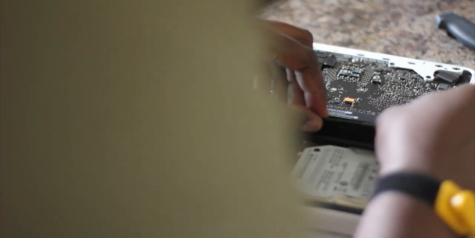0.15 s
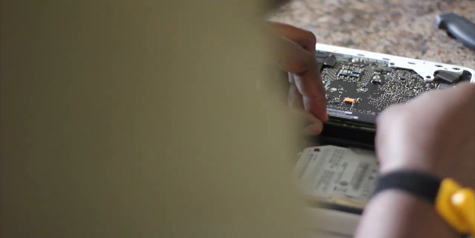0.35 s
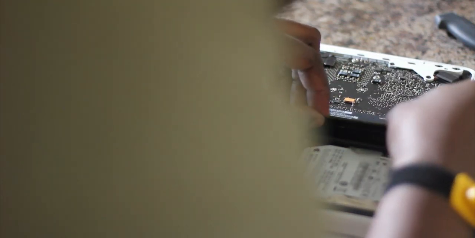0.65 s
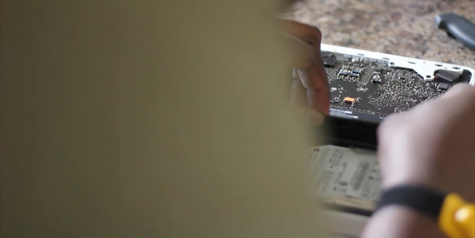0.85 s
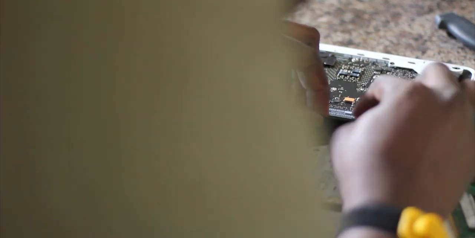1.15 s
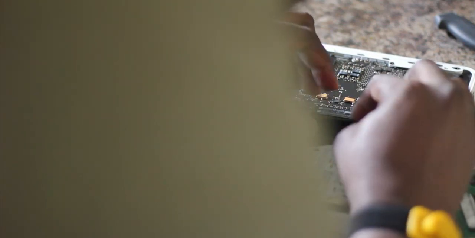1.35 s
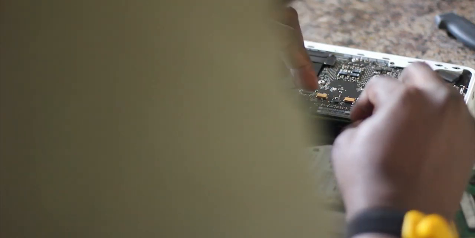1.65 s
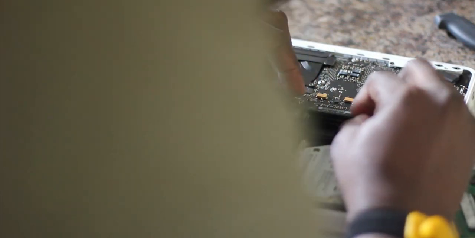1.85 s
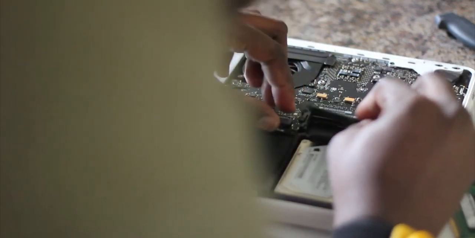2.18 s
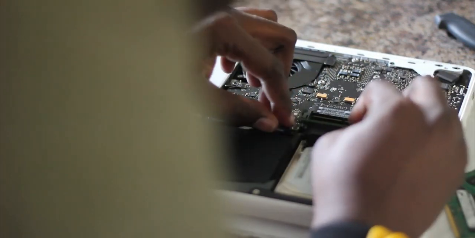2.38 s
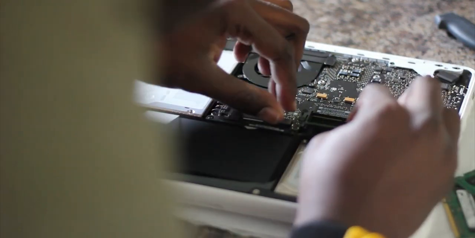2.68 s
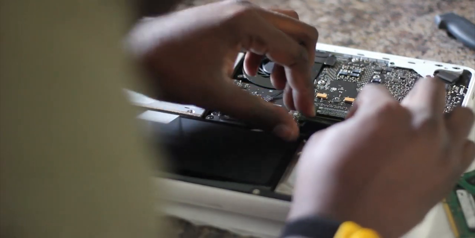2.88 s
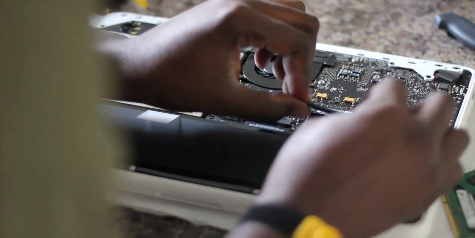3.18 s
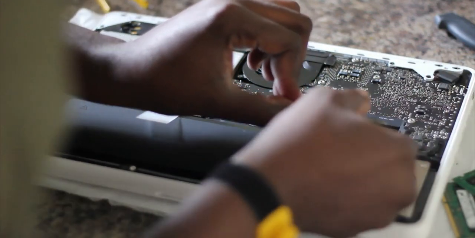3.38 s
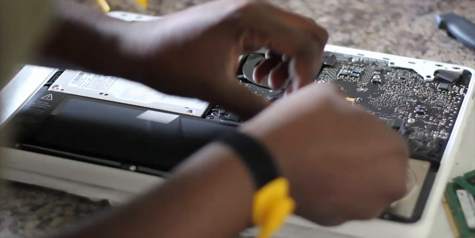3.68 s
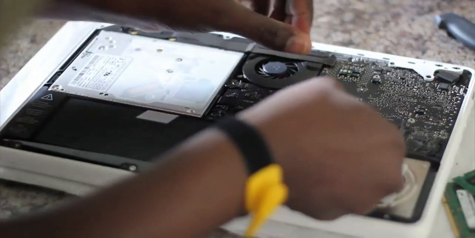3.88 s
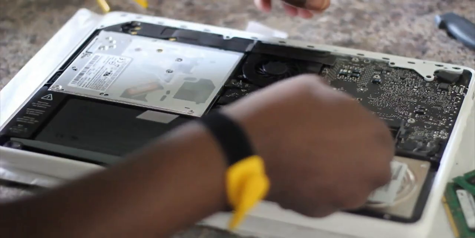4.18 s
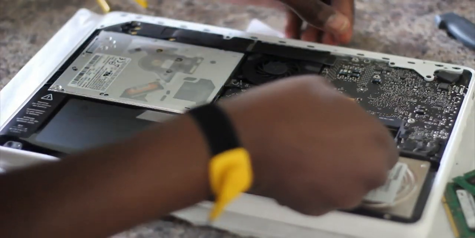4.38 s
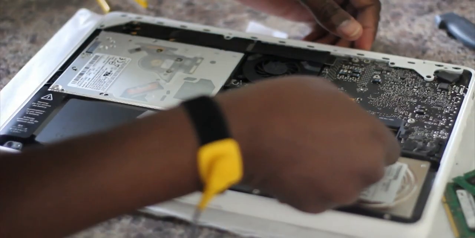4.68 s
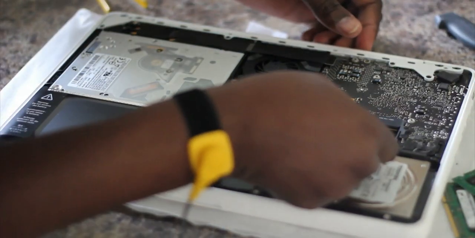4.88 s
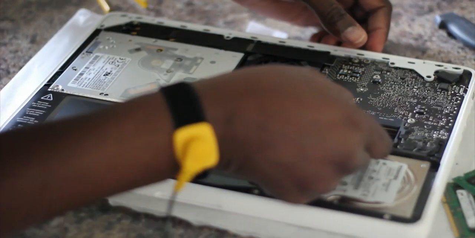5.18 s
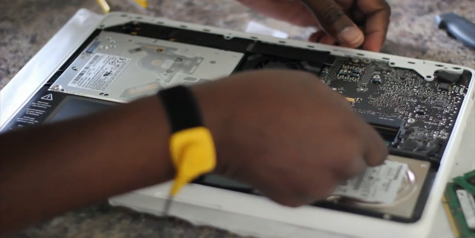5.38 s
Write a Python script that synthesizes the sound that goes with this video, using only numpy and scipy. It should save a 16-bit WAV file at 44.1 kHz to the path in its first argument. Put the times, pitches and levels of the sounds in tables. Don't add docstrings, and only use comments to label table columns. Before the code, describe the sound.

Fingers tick and tap at a memory module; it snaps in sharply, then skin slides and light rocking knocks follow over faint hiss.

```python
import sys
import numpy as np
from scipy import signal
from scipy.fft import rfft, irfft, next_fast_len
from scipy.io import wavfile
from scipy.ndimage import uniform_filter1d, map_coordinates

SR = 44100
rng = np.random.default_rng(int(sys.argv[2]) if len(sys.argv) > 2 else 0)


def dump(signal):
    limited = np.clip(np.atleast_2d(signal).T, -1, 1)
    pcm = np.round(limited * 32767).astype(np.int16)
    wavfile.write(sys.argv[1], SR, pcm)


def volts_from_decibels(level):
    exponent = np.asarray(level, float) / 20
    return 10 ** exponent


N = 244314


def unit(x):
    return x / np.sqrt(np.mean(x ** 2) + 1e-20)


def along(points, hz):
    f, v = np.transpose(points)
    return np.interp(np.log(hz + 1), np.log(f + 1), v)


def curves(rows, outside=None):
    s, *columns = np.transpose(rows)
    return [np.interp(np.arange(N) / SR, s, c, outside, outside) for c in columns]


def wobble(rate):
    knots = rng.standard_normal(int(N * rate / SR) + 4)
    return map_coordinates(knots, [np.arange(N) * rate / SR])


def filtered(x, response):
    m = next_fast_len(x.shape[-1] + 8192)
    spectrum = rfft(x, m) * response(np.fft.rfftfreq(m, 1 / SR))
    return irfft(spectrum, m)[..., :x.shape[-1]]


def mode(f, hz, width):
    return 1j * f * width / (hz * hz - f * f + 1j * f * width)


def evened(x, size=300):
    count = x.shape[-1]
    z = rfft(x, 2 * count)
    local_power = uniform_filter1d(np.abs(z) ** 2, 2 * size * count // SR)
    return irfft(z / np.sqrt(local_power))[..., :count]


def contacts(times, grain_db, t60, count=40):
    t = np.arange(SR // 10) / SR
    blows = volts_from_decibels(grain_db - 60 * t / t60) * rng.standard_normal((len(times), len(t)))
    blows[:, 0] = 1
    return evened(np.pad(blows, ((0, 0), (count, 0))), size=500)


def rung(blows, hz, share, ring, wide):
    hz = hz[:, None]
    x = filtered(blows, lambda f: (1 + ring * mode(f, hz, share * hz)) * mode(f, hz, wide * hz) ** 2)
    return x / np.abs(x).max(1, keepdims=True)


def placed(times, sounds):
    out = np.zeros(N + SR)
    for s, sound in zip(times, sounds):
        out[round(s * SR):][:len(sound)] += sound
    return out[:N]


# (frequency [Hz], level [dB])
HISS_SPECTRUM = [(12, -45), (20, -17), (43, -17), (146, -10), (222, -5.5), (262, -10), (337, -7), (499, -9),
                 (1190, -9.5), (1660, -15), (1810, -12.5), (5080, -16.5), (12400, -22), (16000, -25)]
# (frequency [Hz], width [Hz], level [dB])
DUCT_MODES = [(57.4, 13, -77.5), (126, 8.6, -76.5), (1167, 43, -75)]
# (time [s], level [dB])
MOTOR_LEVEL = [(0.0, -73), (0.42, -84), (0.66, -71), (0.82, -77.5), (1.2, -64.5), (1.53, -68.5),
               (1.76, -78), (3.29, -75.5), (3.78, -85), (4.15, -75), (5.54, -78.5)]


def background():
    hiss_db, motor_hz = -58.5, 90.3
    drone_db, drone_fade_db_per_s = -66.5, 3

    def narrow(hz, width):
        return unit(filtered(rng.standard_normal(N), lambda f: mode(f, hz, width)))

    hiss = unit(filtered(rng.standard_normal(N), lambda f: volts_from_decibels(along(HISS_SPECTRUM, f))))
    hiss *= volts_from_decibels(0.4 * wobble(3))
    duct = sum(volts_from_decibels(db + 1.5 * wobble(3)) * narrow(hz, width) for hz, width, db in DUCT_MODES)
    motor_db = curves(MOTOR_LEVEL)[0] + 1.34 * wobble(3.88)
    motor_phase = 2 * np.pi * np.cumsum(motor_hz + 1.04 * wobble(3.4)) / SR
    motor = volts_from_decibels(motor_db) * np.sqrt(2) * np.sin(motor_phase)
    drone_level = drone_db - drone_fade_db_per_s * np.arange(N) / SR + 1.4 * wobble(3.83)
    drone = volts_from_decibels(drone_level) * narrow(231.7, 16.0)
    return volts_from_decibels(hiss_db - 0.5) * hiss + duct + motor + drone


# (time [s], level [dB], frequency [Hz], t60 [s])
WRIST_BUMPS = [
    (0.0, -46, 74, 0.11),
    (1.868, -45, 507, 0.079),
    (1.874, -41, 238, 0.071),
    (1.908, -40.5, 170, 0.078),
    (1.93, -48, 89, 0.11),
]


def bumps():
    t = np.arange(SR // 4) / SR
    onset = 1 - np.exp(-t / 0.0085)
    times = [row[0] for row in WRIST_BUMPS]
    pushes = [volts_from_decibels(db - 60 * t / t60) * onset * np.sin(2 * np.pi * hz * t)
              for _, db, hz, t60 in WRIST_BUMPS]
    return placed(times, pushes)


# (time [s], peak level [dB], ring [Hz], upper ring relative to ring [dB])
BOARD_PRESSES = [(0.001, -43, 1540, -0.5), (0.026, -42, 1640, .5), (0.23, -44.5, 1560, -1),
                 (0.258, -46, 1640, -7), (0.609, -43.5, 1280, -5), (0.698, -48.5, 1410, 3),
                 (0.713, -39, 1510, -4), (0.816, -39.5, 2050, 2), (2.243, -39.5, 1680, 4.5),
                 (2.342, -49.5, 1180, -22), (2.376, -46.5, 1140, -24), (2.412, -40.5, 1520, -5),
                 (2.473, -50.5, 1460, 2), (2.51, -55, 1450, 8.5), (2.698, -42.5, 1570, 0),
                 (2.786, -41.5, 1420, -33), (2.94, -45, 1310, -0.5), (4.614, -47, 1350, 6),
                 (4.658, -39.5, 1500, -9), (5.078, -50, 2080, -20), (5.149, -49, 1520, -18)]
PLASTIC_TAPS = [
    (1.164, -44, 2250, -21),
    (1.726, -58, 1540, 8.5),
    (1.867, -30, 2180, -38),
    (1.89, -42, 1180, -4),
    (4.218, -30, 954, -23),
    (4.995, -49, 2060, -22),
]


def knocks():
    upper_ratio = 2.15
    press_thud_db, thud_growth, tap_thud_db = -49.5, 1, -72
    rows = [(*r, press_thud_db + thud_growth * (r[1] + 43)) for r in BOARD_PRESSES]
    rows += [(*r, tap_thud_db) for r in PLASTIC_TAPS]
    s, db, low_hz, high_db, thud_db = np.transpose(sorted(rows))
    blows = contacts(s, grain_db=-11, t60=0.02)
    low = rung(blows, low_hz, share=0.11, ring=0.8, wide=0.92)
    high = rung(blows, upper_ratio * low_hz, share=0.29, ring=0.3, wide=0.56)
    thud = rung(blows, np.full(len(s), 460.), share=1.0, ring=5.7, wide=0.74)
    knock = low - volts_from_decibels(high_db)[:, None] * high + volts_from_decibels(thud_db - db)[:, None] * thud
    return placed(s, volts_from_decibels(db)[:, None] * knock)


# (time [s], peak level [dB], ring [Hz], top ring relative to ring [dB])
METAL_TICKS = [(0.0014, -41, 8350, 4), (0.0267, -40, 5460, 5), (0.187, -50, 8380, 5),
               (0.2245, -51, 5600, 9), (0.2292, -32.5, 6430, -17), (0.6082, -45, 4700, -5),
               (0.6858, -43, 4770, -8), (0.6997, -36.5, 7000, -12), (0.7093, -37.5, 5460, 10.5),
               (0.781, -41, 5930, -13), (0.8098, -45, 5970, 5), (0.814, -24.5, 6660, -21),
               (1.162, -38.5, 4640, -13), (1.8672, -50, 5200, 1), (2.2418, -47, 4450, -36),
               (2.4109, -45, 4560, -23), (2.5125, -50, 4410, -14), (2.6978, -59, 4510, -13),
               (3.619, -51, 7180, 4), (4.2195, -45.5, 5030, 1), (4.375, -40, 4770, -11),
               (4.4448, -44, 4430, -2), (4.5017, -45.5, 4300, -3), (4.995, -52, 5200, 2)]
CLIP_BOUNCES = [
    (0.9262, -33, 9100, 0),
    (0.969, -43, 7500, -3),
]


def ticks():
    top_ratio, top_ceiling_hz = 2.25, 13200
    s, db, hz, top_db = np.transpose(METAL_TICKS + CLIP_BOUNCES)
    top_hz = np.minimum(top_ratio * hz, top_ceiling_hz)
    blows = contacts(s, grain_db=-12.5, t60=0.016)
    edge = rung(blows, hz, share=0.038, ring=1.25, wide=0.67)
    top = rung(blows, top_hz, share=0.042, ring=0.9, wide=0.68)
    return placed(s, volts_from_decibels(db)[:, None] * (edge - volts_from_decibels(top_db)[:, None] * top))


# (frequency [Hz], width [Hz], level [dB])
BOARD_MODES = [(1520, 21, 6), (1620, 51, 12), (2020, 13, -30), (2200, 63, -3), (3600, 30, -4),
               (5000, 17, -14)]


def board(x, ring_db):
    def ringing(f):
        return sum((-1) ** k * volts_from_decibels(db) * mode(f, hz, width)
                   for k, (hz, width, db) in enumerate(BOARD_MODES))

    return filtered(x, lambda f: 1 + volts_from_decibels(ring_db) * ringing(f))


def strokes(rows, rising_hz, falling_hz):
    s, db, rise, fall, bright_db = np.transpose(rows)[..., None]
    late = np.arange(0, N / SR, 0.001) - s
    drop = np.where(late < 0, -late / np.abs(rise), late / np.abs(fall))
    power = volts_from_decibels(db - 20 * drop) ** 2
    pitch = np.log(np.where(late < 0, rising_hz, falling_hz))
    return np.array([power, power * volts_from_decibels(bright_db) ** 2, power * pitch]).sum(1)


# (frequency [Hz], level [dB per Hz])
SKIN_SPECTRUM = [(180, -59), (300, -41), (432, 12.5), (812, 4), (974, 4), (1680, 3.5), (3270, -1.5),
                 (12700, -11.5), (15800, -17)]
# (time of peak [s], peak level [dB], 20 dB rise [s], 20 dB fall [s], brightness [dB])
FINGER_STROKES = [(.03, -48.5, 0.14, 0.071, 0), (1.168, -52, 0.014, 0.11, -9),
                  (1.52, -58, 0.044, 0.087, -19), (1.618, -65, .07, .08, -18),
                  (1.732, -53.5, .025, 0.12, -30), (2.3, -75, .02, .12, -10),
                  (2.414, -48.5, 0.0089, .04, -30), (2.54, -59, .3, 0.13, -18),
                  (2.944, -57, 0.068, .03, -22), (3.022, -58, 0.16, 0.032, -9),
                  (3.334, -60, 0.054, 0.13, -1), (3.5, -68.5, .3, 0.091, 9.5),
                  (3.566, -63.5, .07, 0.73, 3.5), (4.2, -65, .2, 0.037, 15), (4.4, -50, 0.024, 0.1, -2),
                  (4.507, -43, 0.04, 0.028, -26), (4.926, -59, 0.034, .025, -18), (5.0, -65, 0.037, .15, 9),
                  (5.076, -57, .03, 0.13, -11), (5.156, -58, 0.26, 0.018, -21)]
HAND_SWEEP = [
    (3.77, -55.5, 0.11, 0.054, 7),
    (3.853, -31.5, 0.097, 0.035, -2.5),
    (3.906, -32, 0.096, .13, -2),
    (4.016, -49, 0.16, 0.06, 6),
]
PALM_STROKES = [
    (4.103, -35.5, 0, .06, 1),
    (4.625, -46, 0.08, 0.1847, 4.5),
    (4.655, -44, -0.08, 0.17, -3),
]
HAND_DRAG = [
    (4.226, -37.5, 0.005, 0.019, -6),
    (4.24, -47.5, .01, 0.23, -5.5),
]
# (resonance in the rise [Hz], resonance in the fall [Hz])
HOLLOW_PITCH = [
    (2070, 1900),
    (2350, 2050),
    (2150, 1975),
    (1500, 1205),
]
# (time [s], level [dB])
SQUEAK_LEVEL = [
    (4.13, -79),
    (4.155, -61),
    (4.185, -54.5),
    (4.195, -76),
]


def slides():
    hollows = np.geomspace(1200, 3500, num=5)
    grit = volts_from_decibels(1.1 * wobble(70) + 1.8 * wobble(500)) * rng.standard_normal(N)
    rub = filtered(grit, lambda f: volts_from_decibels(along(SKIN_SPECTRUM, f)) * f ** 2 / (f + 900j) ** 2)
    body = [unit(filtered(rub, lambda f: (0.52 + mode(f, hz, 0.32 * hz)) * mode(f, 2400, 4600)))
            for hz in hollows]
    fizz = unit(filtered(rub, lambda f: f ** 2 / (f + 4500j) ** 2))

    groups = (HAND_SWEEP, PALM_STROKES, FINGER_STROKES, HAND_DRAG)
    power, bright_power, pitch_sum = sum(strokes(rows, *hz) for rows, hz in zip(groups, HOLLOW_PITCH))

    def per_sample(c):
        return np.interp(np.arange(N) / SR, np.arange(len(c)) / 1000, c)

    level = per_sample(np.sqrt(power))
    bright = per_sample(np.sqrt(bright_power))
    pitch = per_sample(pitch_sum / (power + 1e-30))

    distance = (pitch - np.log(hollows[:, None])) / np.log(hollows[1] / hollows[0])
    share = np.clip(1 - np.abs(distance), 0, 1)
    out = volts_from_decibels(-6.0) * (level * np.sum(np.sqrt(share) * body, 0) + bright * fizz)
    squeak = unit(filtered(grit, lambda f: mode(f, 7900, 700) ** 2))
    return board(out, ring_db=-2.5) + volts_from_decibels(curves(SQUEAK_LEVEL, outside=-120)[0]) * squeak


# (time [s], peak level [dB], rattle t60 [s])
CLIP_SNAP = [
    (0.893, -12.5, 0.013),
]
# (frequency [Hz], level [dB per Hz])
SNAP_SPECTRUM = [(88, -47), (150, -16), (382, -0.5), (727, -10), (1470, 0.5), (2040, 0), (3070, -1),
                 (3880, -9), (5000, -1), (6080, -10.5), (6570, -10), (11800, -12.5), (15800, -17.5)]
# (frequency [Hz], width [Hz], level [dB])
STEEL_MODES = [(4705, 70, -3), (5146, 60, 0), (6498, 90, -5), (9211, 120, -5), (11510, 140, -3)]


def snap():
    shiver_db, shiver_t60 = -27.5, 0.4
    s, db, t60 = CLIP_SNAP[0]
    t = np.arange(SR // 2) / SR
    blows = rng.standard_normal(len(t)) * volts_from_decibels(3.7 * rng.standard_normal(len(t)))
    onset = 1 - np.exp(-t / 0.00081)
    decay = volts_from_decibels(-60 * t / t60) + volts_from_decibels(shiver_db - 60 * t / shiver_t60)
    rattle = evened(blows * onset * decay)

    def steel(f):
        return 1 + volts_from_decibels(4.0) * sum(volts_from_decibels(level) * mode(f, hz, width) for hz, width, level in STEEL_MODES)

    rattle = filtered(rattle, lambda f: volts_from_decibels(along(SNAP_SPECTRUM, f)) * steel(f))
    rattle = filtered(rattle, lambda f: (f / (f - 140j)) ** 2)
    rattle /= np.abs(rattle).max()
    touch = filtered(rattle, lambda f: mode(f, 2000, 2500))
    return placed([s - 0.005, s], [volts_from_decibels(db - 15) * touch, volts_from_decibels(db - 3) * rattle])


# (time [s], peak level [dB], upper modes relative [dB])
MODULE_ROCKS = [
    (4.374, -30, -12.5),
    (4.39, -32, -10.5),
    (4.419, -40, -11),
    (4.431, -39, -14),
    (4.457, -46, 1),
    (4.467, -42.5, -3),
    (4.499, -43, -15),
    (4.508, -42, -6),
    (4.529, -37, -14),
]
# (frequency [Hz], width [Hz], level [dB])
MODULE_MODES = [(467, 53, -5.5), (1530, 24, 3.5), (1900, 53, 0.5), (2210, 92, -6.5), (2690, 25, 3),
                (3480, 79, -6)]


def rocks():
    s, db, upper_db = np.transpose(MODULE_ROCKS)
    lift_db = upper_db[:, None] + 9

    def modes(f):
        return sum((-1) ** k * volts_from_decibels(level + (hz > 2300) * lift_db) * mode(f, hz, 3.4 * width)
                   for k, (hz, width, level) in enumerate(MODULE_MODES))

    x = filtered(contacts(s, grain_db=-19.5, t60=0.031), modes)
    return placed(s, volts_from_decibels(db)[:, None] * x / np.abs(x).max(1, keepdims=True))


# (frequency [Hz], t60 [s])
ROOM_T60 = [(200, 0.19), (1000, 0.48), (3000, 0.51), (8000, 0.26), (15000, 0.1)]


def room(x, count=12):
    out, part = np.zeros(N + SR), N // count + 1
    for k in range(count):
        hz, t, z = signal.stft(rng.standard_normal(SR * 3 // 4), SR, nperseg=256)
        walls = volts_from_decibels(-60 * t / along(ROOM_T60, hz)[:, None])
        near = 0.78 * volts_from_decibels(-60 * t / 0.2)
        tail = evened(signal.istft(z * (walls + near), SR, nperseg=256)[1])
        tail *= 1 - np.exp(-np.arange(len(tail)) / SR / 0.0015)
        wet = signal.fftconvolve(x[k * part:][:part], tail / np.linalg.norm(tail))
        out[k * part:][:len(wet)] += wet
    return out[:N]


def scene():
    tap, tick, rock, clips, rub = knocks(), ticks(), rocks(), snap(), slides()
    small = volts_from_decibels(1.0) * tap + volts_from_decibels(-2.0) * tick + volts_from_decibels(-2.5) * rock
    wet = room(small + volts_from_decibels(5.5) * clips + volts_from_decibels(-8.5) * rub)
    direct = tap + tick + rock + clips + rub + bumps()
    return (direct + wet + background())[None]


def band_limit(x):
    return signal.sosfilt(signal.butter(12, 16350, fs=SR, output="sos"), x)


def record(dry):
    top_hz = 15830
    mix = filtered(dry, lambda f: f < top_hz)
    return band_limit(mix)


dry = scene()
out = record(dry)
dump(out)
```